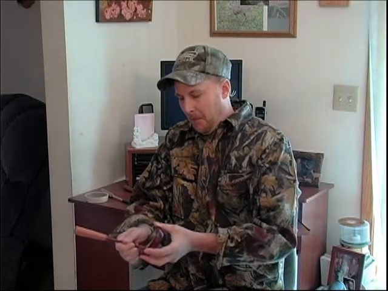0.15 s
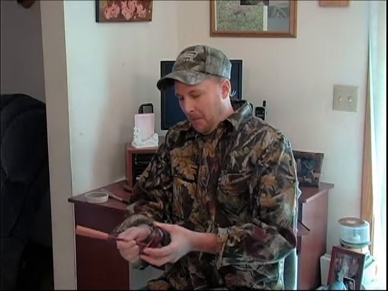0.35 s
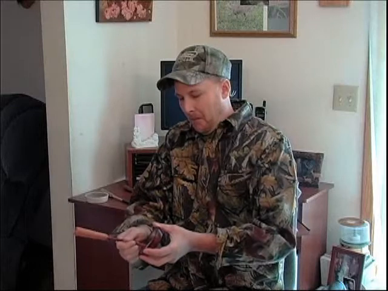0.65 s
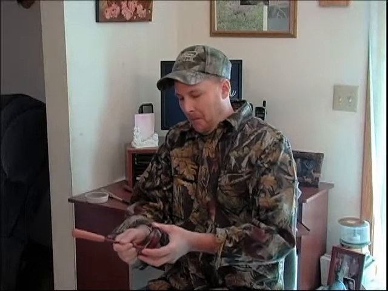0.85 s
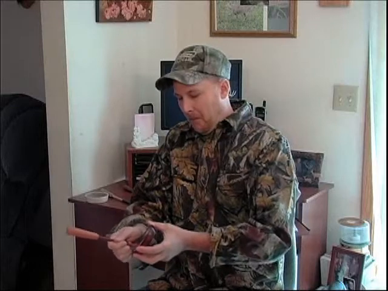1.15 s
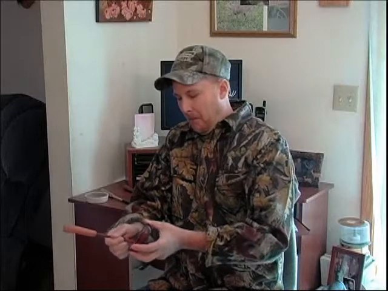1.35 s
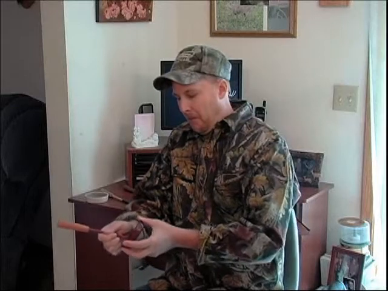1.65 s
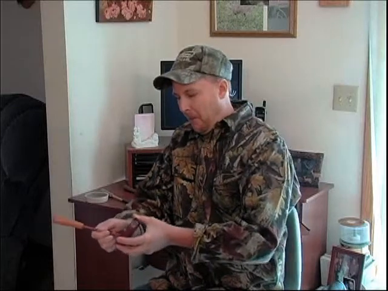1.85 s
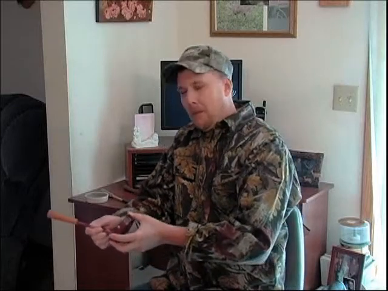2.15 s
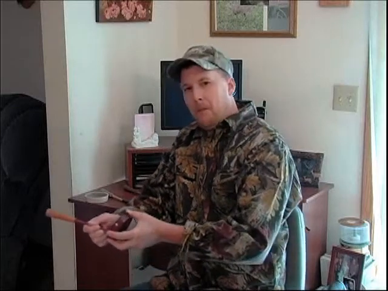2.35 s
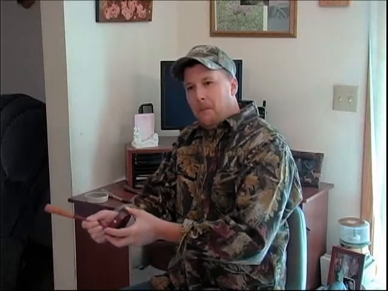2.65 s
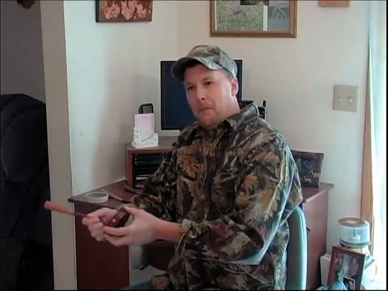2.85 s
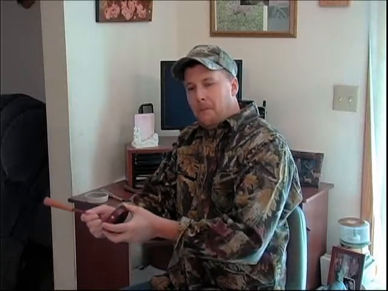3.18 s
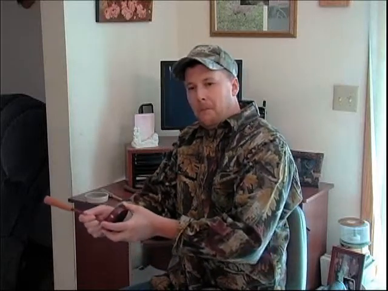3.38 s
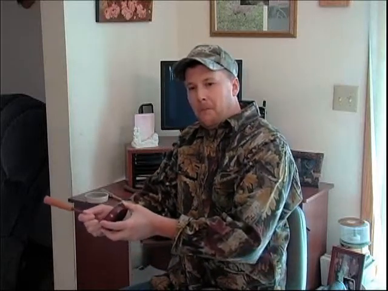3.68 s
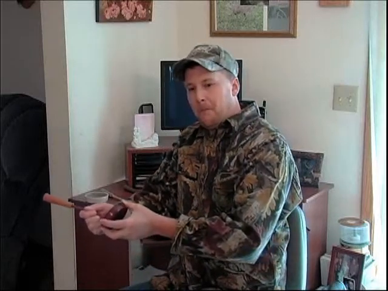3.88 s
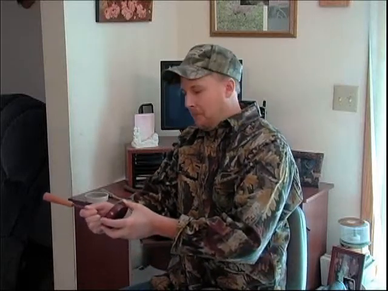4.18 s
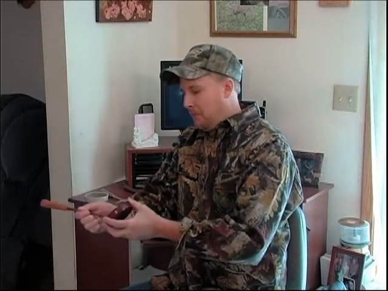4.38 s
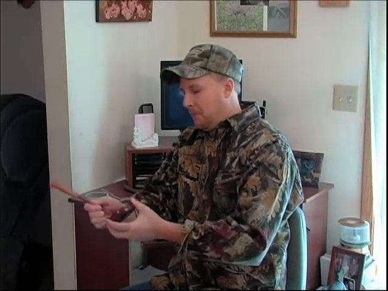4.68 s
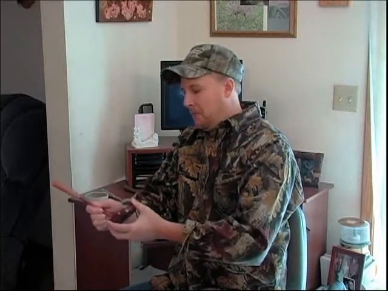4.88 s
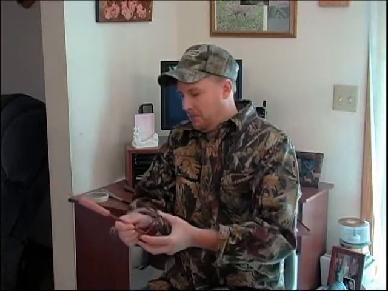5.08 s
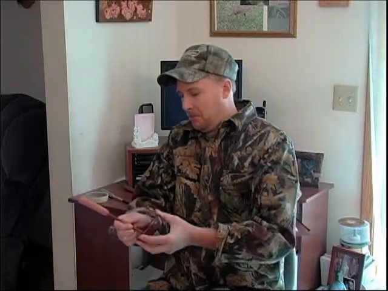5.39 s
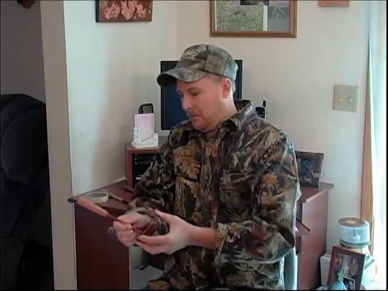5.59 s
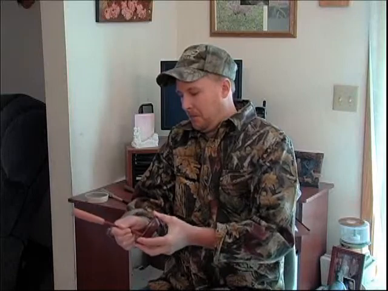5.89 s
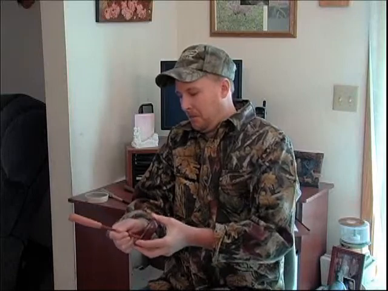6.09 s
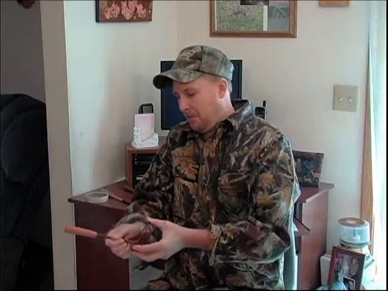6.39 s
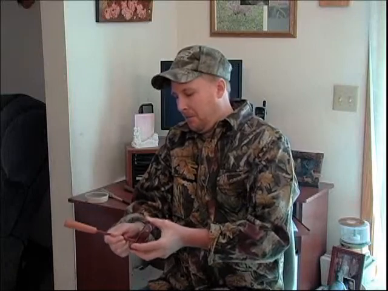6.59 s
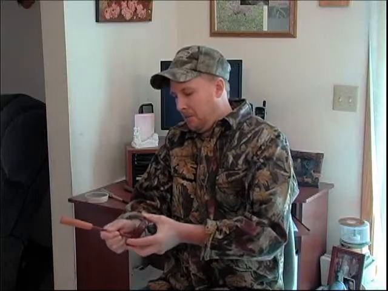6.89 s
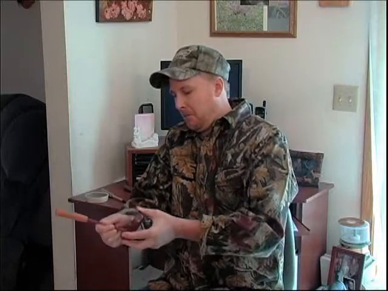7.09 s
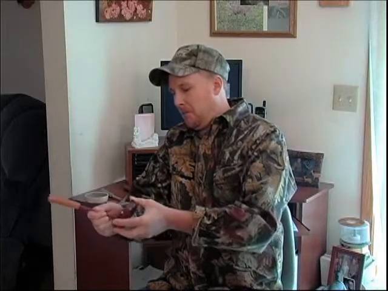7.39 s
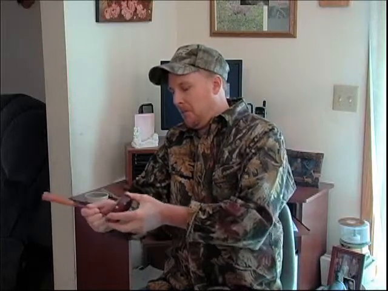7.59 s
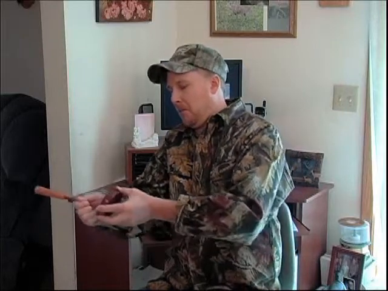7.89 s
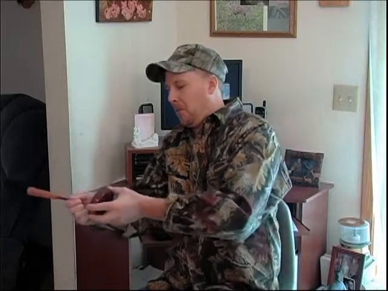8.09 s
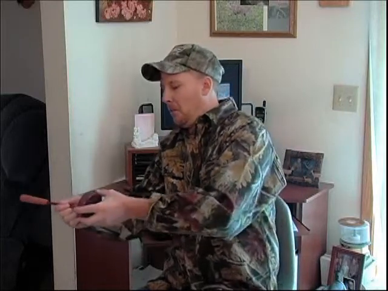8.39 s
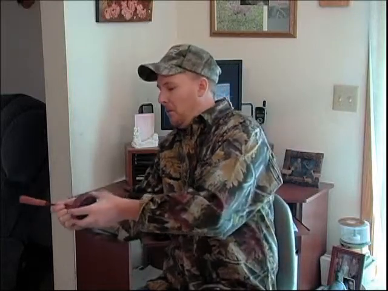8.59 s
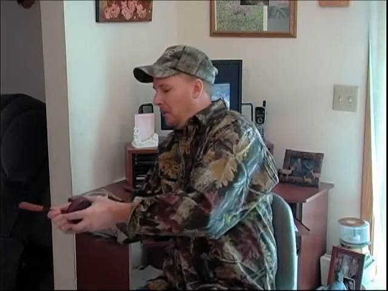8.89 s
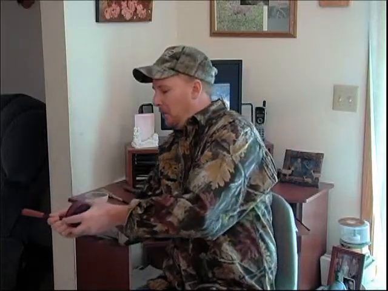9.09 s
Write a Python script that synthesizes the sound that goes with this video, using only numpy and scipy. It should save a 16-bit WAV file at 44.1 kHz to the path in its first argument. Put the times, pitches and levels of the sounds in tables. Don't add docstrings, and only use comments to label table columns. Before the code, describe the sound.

In a living room, a wooden striker rubs a glass pot call close to the left of a stereo camera microphone. About three sharp yelps a second start high, drop into a nasal squeal and crack into rasp. After four and a half seconds they stop; faint scuffs and three short clucks follow, then another run of yelps to the end. Low motor hum, hissy air and a thin high screen whistle sit behind.

```python
import sys
import numpy as np
from scipy import signal
from scipy.fft import rfft, irfft, next_fast_len
from scipy.io import wavfile
from scipy.ndimage import map_coordinates

SR = 44100
rng = np.random.default_rng(int(sys.argv[2]) if len(sys.argv) > 2 else 0)


def amplitude_ratio(level_db):
    exponent = np.asarray(level_db, float) / 20
    return 10 ** exponent


def to_wav(s):
    ch = np.atleast_2d(s).T
    pcm = np.round(np.clip(ch, -1, 1) * 32767)
    wavfile.write(sys.argv[1], SR, pcm.astype(np.int16))


N = 407925


def unit(x):
    return x / np.sqrt(np.mean(x ** 2) + 1e-20)


def along(points, hz):
    f, value = np.transpose(points)
    return np.interp(np.log(hz + 1), np.log(f + 1), value)


def wobble(rate, size):
    knots = rng.standard_normal(size // 20 + 4)
    return map_coordinates(knots, [np.arange(size) * rate / SR])


def step(t, width):
    return .5 + .5 * np.tanh(t / width)


def add(out, x, at):
    out[:, at:at + x.shape[1]] += x
    return out


# time of the drop in seconds, locked slip rate in Hz, squeal level in dB,
# lead-in in seconds, lead-in relative level in dB.
FIRST_RUN = [(-.03, 880.8, -10, 0.0083, -6.5), (.306, 882, -12.5, 0.033, -15),
             (.631, 878.7, -13.5, 0.029, -5), (.953, 895, -16, 0.037, -1.5), (1.266, 876, -14, 0.031, -8),
             (1.587, 889.4, -17, 0.023, -3), (1.934, 883, -13, 0.044, -6.5),
             (2.240, 884, -13.5, 0.049, -11.5), (2.552, 881.5, -12.5, .035, -7),
             (2.862, 891, -13.5, .035, -0.5), (3.191, 888, -12, 0.027, -10),
             (3.503, 890.7, -10.5, 0.047, -10), (3.837, 906.4, -11, 0.047, -5.5),
             (4.162, 883, -12, 0.021, -10.5)]
CLUCKS = [
    (5.508, 1071, -32, 0.015, 3.5),
    (5.722, 969, -12.5, 0.026, -21.5),
    (5.94, 962, -12.5, 0.0084, -13),
]
SECOND_RUN = [
    (6.586, 916.6, -16, 0.054, -6),
    (6.844, 911.5, -12, 0.022, -7),
    (7.143, 882.6, -15.5, 0.037, -1.5),
    (7.444, 883.2, -16.5, 0.014, 1),
    (7.739, 880.5, -15, 0.01, -12),
    (8.023, 881, -16, .018, -14.5),
    (8.311, 901, -17, .013, -17.5),
    (8.613, 898.3, -18, .02, 5),
    (8.906, 889.4, -15.5, 0.041, 1),
    (9.202, 906, -20, .027, 6),
]
# time after the drop in seconds, slow slip rate in Hz,
# chatter relative level in dB, slow slip relative level in dB.
BREAKS = [(.07, 790, -11, -21.5), (.074, 830, -10.5, -15), (.062, 250, -5, -42.5), (.062, 810, -9.5, -7),
          (.036, 656, -8.5, -4.5), (.05, 833, -3.2, -8.5), (0.02, 650, -18, 5.5), (.036, 638, -8.5, -5),
          (.03, 662, -7.5, -6), (.035, 574, -8.5, -0.5), (0.022, 640, -7, -7), (0.023, 740, -6, -10),
          (0.021, 500, -0.5, -34.5), (0.041, 697, -9.5, -8.5), (0.018, 540, -4.5, -36),
          (0.022, 530, -1, -34.5), (0.013, 480, -4, -39.5), (.03, 809, -8.5, -56), (.05, 870, -7, -17),
          (.044, 777, -7, -11), (.041, 755, 2.5, -20.5), (.04, 790, -3, -6.5), (.04, 758, -8.5, -6),
          (.05, 800, -3.5, -9), (0.05, 793, -7.5, -9), (0.051, 792, -15, -4), (.098, 760, -11.7, 1)]
# time in seconds, pressure from 0 to 1, steepness of the striker from 0 to about 1.
HAND = [(0, 0.2, .9), (.95, 0.48, .7), (1.27, 0.77, .95), (1.932, 0.7, 1.05), (2.55, 0.78, .55),
        (3.19, 0.85, .75), (4.158, 0.8, .4), (5.5, 0.9, 0), (5.94, 0.8, .3), (6.59, 0.02, 0.3),
        (6.85, 0.15, .6), (7.14, 0.59, .3), (7.74, .55, .3), (8.2, 1, .3), (8.6, 0.64, .05),
        (9.2, 0.81, .1)]


def strokes():
    times, pressure, steepness = np.transpose(HAND)
    rows = [*FIRST_RUN, *CLUCKS, *SECOND_RUN]
    first_cluck = len(FIRST_RUN)
    after_rest = first_cluck + len(CLUCKS)
    for i, (row, (squeal, slow_hz, chatter_db, slow_db)) in enumerate(zip(rows, BREAKS)):
        s, lock_hz, db, lead, lead_db = row
        hard = np.interp(s, times, pressure)
        steep = np.interp(s, times, steepness)
        cluck = first_cluck <= i < after_rest
        rasp = 0.22 - 0.1 * hard
        bite_db = -3.5 + 6 * hard
        lead_hz = 1096 + 131.35 * steep - 110 * (i == after_rest)
        if cluck:
            rasp *= 0.43
            bite_db += 0.47 * (db + 7.5)
            lead_hz = lock_hz + 37
        tone_db = (-3 + 10 * hard + 4.5 * cluck, 4 + 6.5 * steep, 4 + 0.5 * steep, 10.5 * steep)
        yield s, db, dict(
            lead=lead, lead_db=lead_db, lead_hz=lead_hz, sag_hz_per_s=3200 * steep, lock_hz=lock_hz,
            squeal=squeal, slow_hz=slow_hz, rasp=rasp, chatter_db=chatter_db, slow_db=slow_db,
            bite_db=bite_db, jolt_db=8 - 3 * steep - 4.5 * cluck, drop=0.00302 + 0.003075 * steep,
            tone_db=tone_db, grit_db=-10 + 21.5 * hard)


def slips(rate_hz, bite_db, light, tone_db):
    phase = 2 * np.pi * np.cumsum(rate_hz) / SR
    k = np.arange(1, 15)[:, None]
    main_mode_hz = POT[3][0]
    tuned = np.exp(-((2 * rate_hz - main_mode_hz) / 90) ** 2)
    scatter_db = rng.normal(0, 5, k.shape) * (k > 5)
    colour_db = np.select([k == 1, k == 3, k == 4, k == 5], tone_db, scatter_db)
    upper_db = 14 * light ** 3 * (k > 1) + 20 * np.sqrt(light) * np.log2(np.maximum(k / 2, 1))
    fade_db = 12 * tuned * (k == 1) + upper_db
    return np.sum(amplitude_ratio(bite_db * np.log2(k) + colour_db - fade_db) * np.cos(k * phase), axis=0)


def stroke(lead, lead_db, lead_hz, sag_hz_per_s, lock_hz, squeal, slow_hz, rasp, chatter_db, slow_db,
           bite_db, jolt_db, drop, tone_db, grit_db):
    size = SR * 3 // 10
    t = np.arange(size) / SR - lead
    early = step(-t - drop, drop)
    rough = step(t - squeal, 0.0036)

    grip = step(t + lead * .62, lead * .24)
    lead_gain_db = lead_db * step(-t - .005, 0.0019)
    tremor_db = (3.15 + 3 * early + 0.94 * rough) * np.tanh(wobble(90, size))
    arch_db = 4.5 * (np.sin(np.pi * np.clip(t / squeal, 0, 1)) - .5)
    press = amplitude_ratio(lead_gain_db + tremor_db - 67.5 * np.clip(t, 0, squeal) + arch_db)
    overshoot = 1.3 * np.exp(-((t + .002) / .005) ** 2)
    rebound = np.exp(-((t - .009) / .003) ** 2)
    jolt = amplitude_ratio(jolt_db * (overshoot - rebound))
    lift = amplitude_ratio(-22 * np.clip(t - squeal, 0, None) / rasp)

    above = (lead_hz - lock_hz - sag_hz_per_s * (t + lead / 2) + 12 * wobble(200, size)) * early
    above += 25 * np.exp(-np.abs(t) / (1.48 * drop))
    rate = lock_hz + above + 3 * wobble(55.3, size) + rough * 30 * wobble(297.1, size)
    settling = .22 * np.exp(-np.abs(t) / .011)
    light = np.clip(above / 280 + 0.0067 * rough + settling, 0, 1)
    hops = np.tanh(wobble(110, size))
    locked = slips(rate, bite_db, light, tone_db)
    locked *= 1 - rough + rough * amplitude_ratio(chatter_db + 4.6 * hops + 3)

    slow_rate = slow_hz * (1 + 0.02403 * wobble(248.3, size) + 0.02074 * wobble(25.27, size))
    slow = slips(slow_rate, bite_db, 0.016, (7.0, 1.5, 5.0, 5.6))
    flutter_db = 5 * np.tanh(wobble(130, size))
    slow *= rough * amplitude_ratio(chatter_db + slow_db + 11.0 - 10.95 * hops + flutter_db)

    grain = rng.standard_normal(size) * amplitude_ratio(grit_db + 1.8 * np.tanh(wobble(150, size)))
    catch = amplitude_ratio(-11 - .6 * lead_db) * early
    grit = grain * (amplitude_ratio(-19.0) + catch + rough * amplitude_ratio(chatter_db + 14.5 + 1.01 * slow_db))
    return grip * press * jolt * lift * (locked + slow + grit)


# frequency in Hz, bandwidth in Hz, level in dB.
POT = [(1129.7, 100, -1.5), (1231.5, 164.7, 3), (1539, 274, 4), (1790, 122.6, 11.5), (1823.6, 235.7, 5.5),
       (2746, 160, -14), (2850, 280, -24), (3700, 72, -20), (4445, 94, -13), (4920, 1200, -23.5),
       (7340, 500, -64.5), (9300, 6700, -59.5)]


def pot(hz):
    modes = 0
    for k, (centre, width, db) in enumerate(POT):
        damping = 1j * hz * width
        modes = modes + (-1) ** k * amplitude_ratio(db) * damping / (centre * centre - hz * hz + damping)
    radiation = (hz * hz / (hz * hz - 800 ** 2 - 1j * hz * 900)) ** 2
    return modes * radiation / (1 + 1j * hz / 9000) ** 2


# frequency in Hz, decay time to -60 dB in seconds.
ROOM = [(600, 0.49), (1800, 0.52), (2700, 0.44), (4500, 0.49), (10000, 0.12)]


def heard(force, s, pan_db, out):
    hz, t, z = signal.stft(rng.standard_normal((2, 30000)), SR, nperseg=256)
    decay = amplitude_ratio(-60 * t / along(ROOM, hz)[:, None])
    tail = signal.istft(z * decay, SR, nperseg=256)[1][:, :30000]
    tail = np.pad(tail / np.linalg.norm(tail[0]), ((0, 0), (150, 0)))
    path = tail * amplitude_ratio([[-5.5], [-3.5 - pan_db]])
    path[[0, 1], [0, 10]] = 1, amplitude_ratio(-6 - pan_db)
    size = next_fast_len(len(force) + path.shape[1])
    response = pot(np.fft.rfftfreq(size, 1 / SR)) * rfft(path, size)
    sound = irfft(rfft(force, size) * response, size)
    return add(out, sound, SR + round(s * SR))


def yelps(out):
    for s, db, settings in strokes():
        heard(amplitude_ratio(db + 7.0) * stroke(**settings), s - settings["lead"], 12.5, out)


# start in seconds, level in dB, dullness corner in Hz, length in seconds,
# click relative level in dB.
TAPS = [
    (0.946, -23, 8900, 0.00025, 5.5),
    (2.236, -20, 9100, 0.00069, -1.5),
    (4.792, -76, 5000, 0.016, -26.5),
    (5.042, -48.5, 1200, 0.0065, -31),
    (5.189, -71.5, 1500, 0.065, -45.5),
    (5.603, -60.5, 5000, 0.007, -40),
    (6.053, -61, 12100, 0.038, 14),
    (6.476, -65, 1970, 0.005, -35),
]


def taps(out):
    t = np.arange(SR // 8) / SR
    for s, db, hz, long, click_db in TAPS:
        keep = np.exp(-2 * np.pi * hz / SR)
        burst = rng.standard_normal(len(t)) * np.exp(-t / long)
        blow = signal.lfilter([1 - keep], [1, -keep], burst)
        heard(amplitude_ratio(db + 30) * blow, s, 12, out)
        add(out, amplitude_ratio(db + click_db) * blow * amplitude_ratio([[0], [-9]]), SR + round(s * SR))


def call():
    out = np.zeros((2, N + 3 * SR))
    yelps(out)
    taps(out)
    return out[:, SR:SR + N]


def coloured(gain):
    size = next_fast_len(N)
    spectrum = rfft(rng.standard_normal((2, size))) * gain(np.fft.rfftfreq(size, 1 / SR))
    return unit(irfft(spectrum, size)[:, :N])


# frequency in Hz, level in dB.
DRAG = [(3000, -30), (5000, -5.5), (8000, 1.5), (12000, -10.5), (15500, -21.5)]


def drag():
    t = np.arange(N // 32 + 1) * 32 / SR
    rows = list(strokes())
    level = np.zeros(len(t))
    for (a, _, settings), (b, *_) in zip(rows, rows[1:]):
        if b - a < .4:
            level += amplitude_ratio(0.56 * settings["grit_db"]) * np.exp(-((t - b + 0.084) / 0.09) ** 2)
    for s, db, settings in rows:
        squeal = settings["squeal"]
        burst_db = db + settings["grit_db"] + .5 * settings["slow_db"] + 28
        fall_db = 230 * np.abs(t - s - squeal)
        level += amplitude_ratio(burst_db - fall_db) * step(t - s - 0.11 * squeal, 0.0038)
    grains = amplitude_ratio(2.5 * np.tanh(wobble(120, N)) + 3 * np.tanh(wobble(5, N)))
    hiss = coloured(lambda hz: amplitude_ratio(along(DRAG, hz) + [[0], [-9]]))
    return amplitude_ratio(-63.5) * np.repeat(level, 32)[:N] * grains * hiss


# frequency in Hz, level in dB per Hz.
AIR = [(15, -48.5), (25, -20.5), (144, -6), (198, -15.5), (410, -17.5), (537, -19), (598, -23.5),
       (722, -15), (1240, -27.5), (13500, -38), (15500, -33)]
# frequency in Hz, left-right difference in dB.
LEAN = [(40, 15.5), (200, 13), (700, 6), (2400, 2), (8000, -2)]


def air():
    return amplitude_ratio(-55.0) * coloured(lambda hz: amplitude_ratio(along(AIR, hz) + along(LEAN, hz) * [[.5], [-.5]]))


# frequency in Hz, left level in dB, right level in dB, wander in dB.
HUM = [(69.6, -65, -71, -1), (118, -55, -83.5, 0), (149.7, -50, -79, 0.5), (248.5, -65.5, -78.5, 4),
       (477, -74, -77, 10), (543, -61.5, -77, -3), (756, -80.5, -67.5, 2), (15734, -73, -65, 0.5)]


def hum():
    t = np.arange(N) / SR
    tones = np.zeros((2, N))
    for hz, left, right, wander in HUM:
        level = amplitude_ratio([[left], [right]] + wander * np.tanh(wobble(4.5, N)))
        tones += level * np.sin(2 * np.pi * hz * t + 0.84 * wander / 3 * wobble(27, N))
    return tones


# time in seconds, length in seconds, level in dB.
SHUFFLES = [
    (5.2, 0.067, -78),
    (8.553, 0.042, -40.5),
    (8.839, 0.031, -55),
]


def shuffles():
    t = np.arange(N) / SR
    swell = sum(amplitude_ratio(db) * np.exp(-((t - s) / long) ** 2) for s, long, db in SHUFFLES)
    return swell * coloured(lambda hz: hz / (70 + hz) / (1 + (hz / 250) ** 2) * amplitude_ratio([[0], [-9]]))


def scene():
    return call() + drag() + air() + hum() + shuffles()


def roll_off(x):
    return signal.sosfilt(signal.butter(12, 15870, fs=SR, output="sos"), x)


def record(dry):
    def follow(seconds):
        share = 1 / (seconds * SR)
        start = np.mean(dry[0, :SR // 50] ** 2)
        return signal.lfilter([share], [1, share - 1], dry[0] ** 2, zi=[start])[0]

    power = follow(0.067) + .5 * follow(0.02)
    held = dry * (1 + power / amplitude_ratio(-37)) ** -.26
    held = held / (1 + np.abs(held) ** 4) ** .25
    return roll_off(held)


dry = scene()
out = record(dry)
to_wav(out)
```